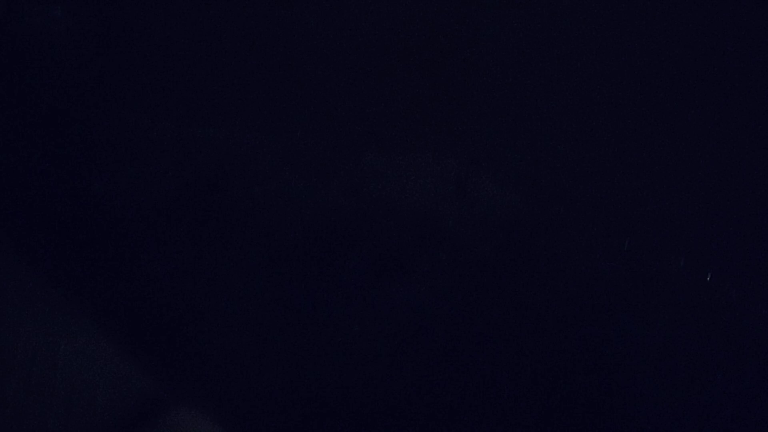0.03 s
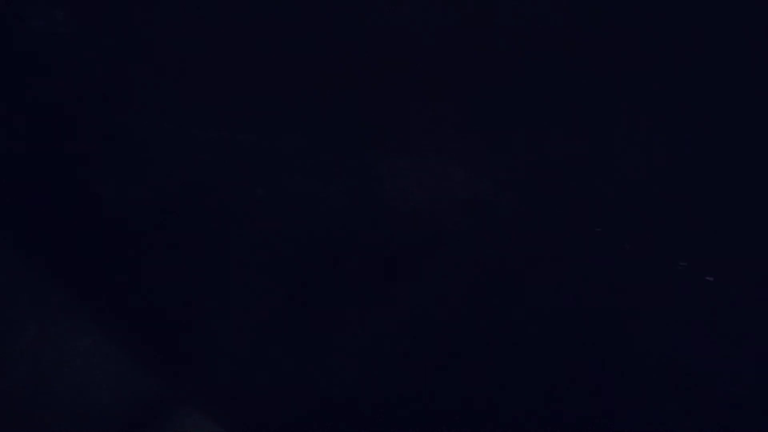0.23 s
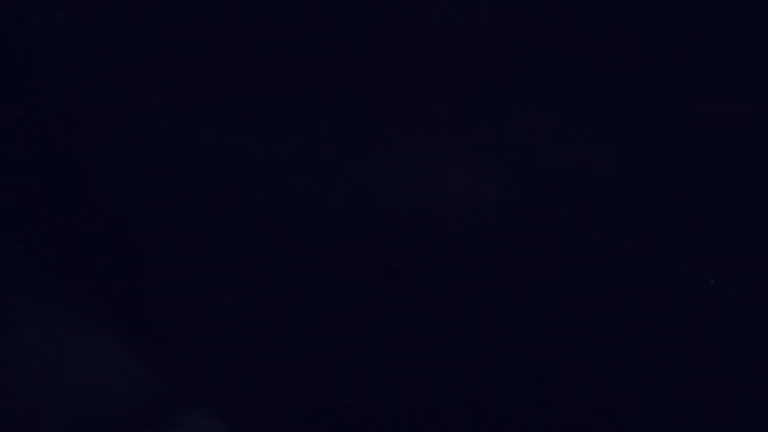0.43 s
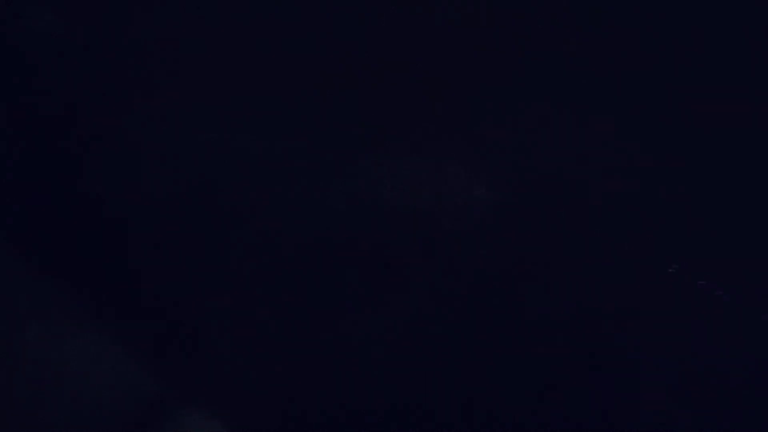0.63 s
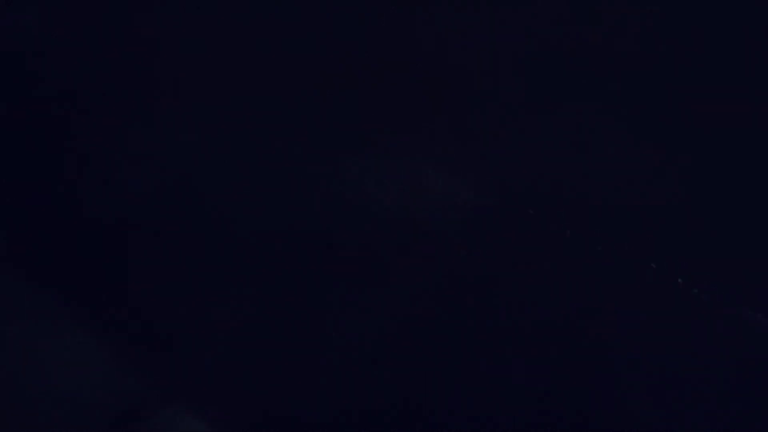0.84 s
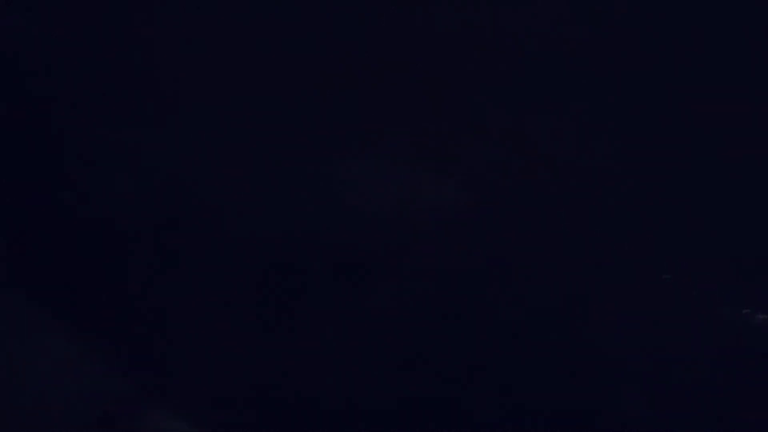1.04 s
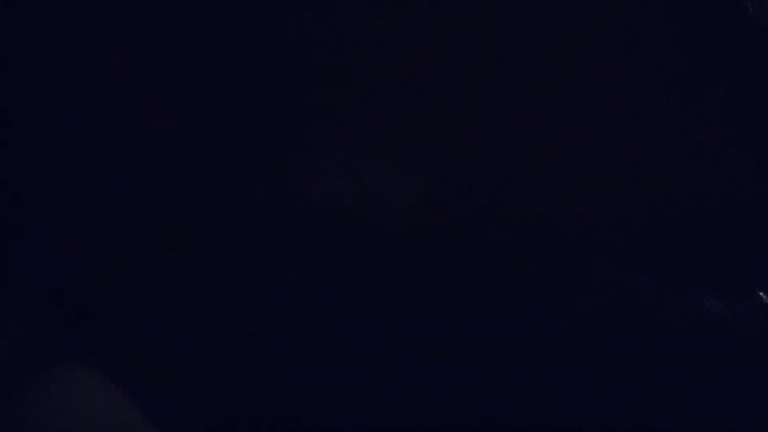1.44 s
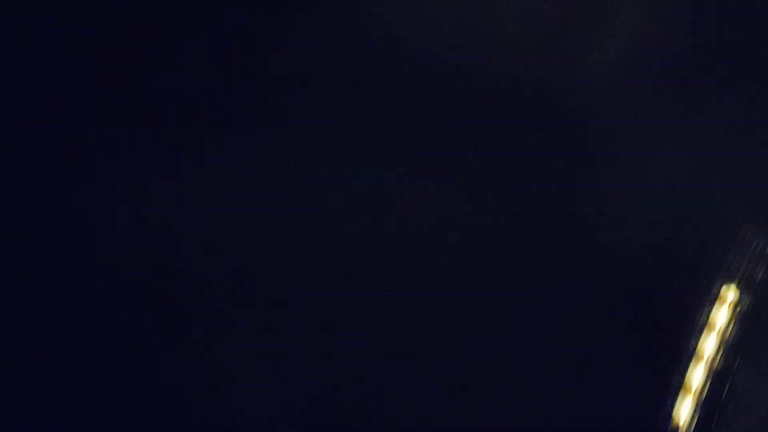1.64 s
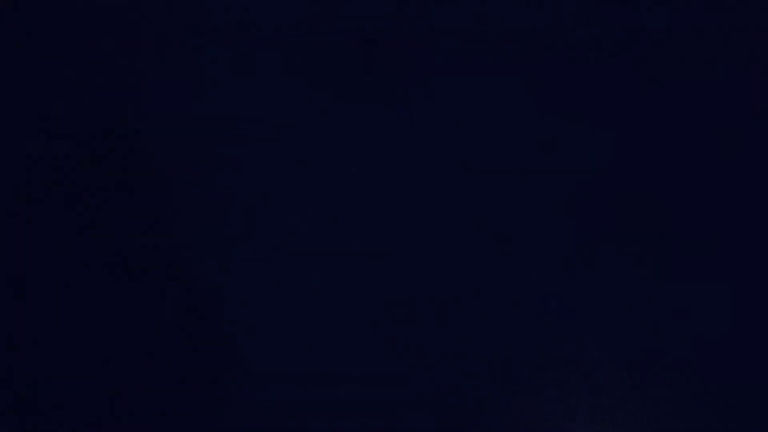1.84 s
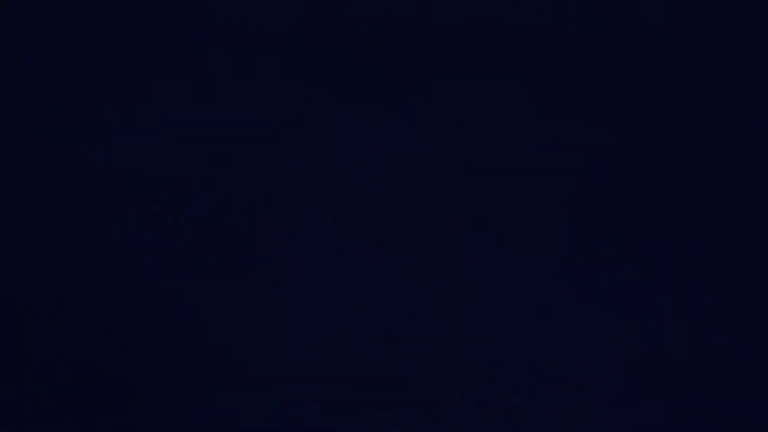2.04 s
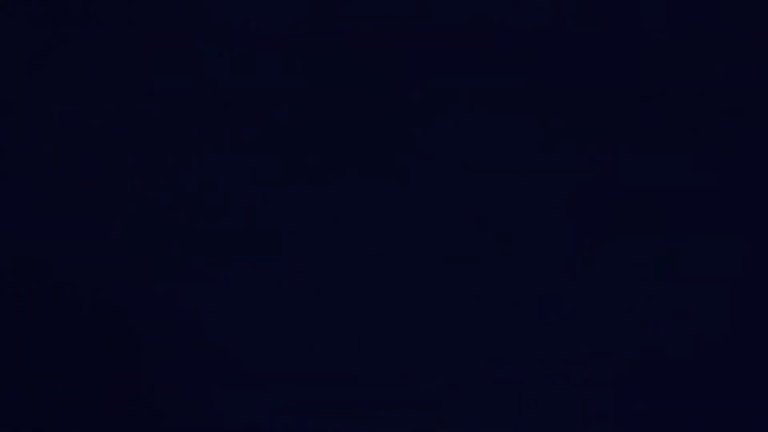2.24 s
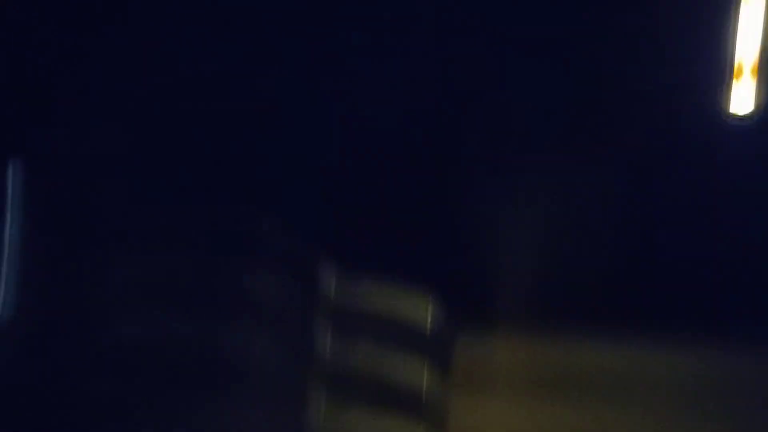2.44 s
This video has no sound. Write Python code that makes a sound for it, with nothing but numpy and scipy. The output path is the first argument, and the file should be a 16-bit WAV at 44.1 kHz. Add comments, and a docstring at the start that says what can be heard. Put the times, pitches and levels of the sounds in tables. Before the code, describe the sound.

A close frog's loud, rapid trill, then a softer frog answers over faint insect chirps.

```python
"""Night air fades in, an insect starts its falling chirps, and a frog swells into a trill close by.
Each pulse of the trill is a small arch of pitch from the vocal folds that rings the vocal sac.
A hand on the camera adds low rumble, soft bumps and clicks, thickest as the frog slows and stops.
Then a second frog, farther off, winds up into its own trill while the insect carries on behind it."""
import sys
import numpy as np
from scipy import signal
from scipy.fft import rfft, irfft
from scipy.io import wavfile
from scipy.ndimage import uniform_filter1d

SR = 44100
rng = np.random.default_rng(int(sys.argv[2]) if len(sys.argv) > 2 else 0)


def generate_wav(sig):
    """Save sig (samples, or channels by samples) to the path in sys.argv[1] as 16-bit PCM at SR."""
    pcm = np.round(np.clip(np.atleast_2d(sig).T, -1, 1) * 32767).astype(np.int16)
    wavfile.write(sys.argv[1], SR, pcm)


N = 110250

# Pace of each trill. Each row: time in seconds, pulses per second.
NEAR_PULSE_RATE = [(.176, 47.29), (.38, 45.72), (.62, 46.09), (.9, 45.96), (1.17, 45.75), (1.4, 41.26),
                   (1.56, 40.26), (1.67, 29.99)]
FAR_PULSE_RATE = [(1.82, 42.5), (1.95, 43.3), (2.06, 45.6), (2.25, 44.9), (2.5, 44.6)]
# Fader and pan of each frog. Each row: time in seconds, gain in dB, left minus right in dB,
# phase lead of the left side in radians.
NEAR_PLACEMENT = [(.17, -24.5, 7, -0.23), (.27, -16, 7, -.15), (.41, -10, 7, -0.18), (.72, -8.5, 7.5, 0.18),
                  (.95, -8.5, 7.5, 0.41), (1.3, -7, 6, .3), (1.42, -7.5, 5, 0.2), (1.53, -8, 1.5, -0.058),
                  (1.66, -9, -0.5, -0.22)]
FAR_PLACEMENT = [(1.82, -46, -1.5, -2.8), (1.93, -42, 3, -1.45), (2.04, -30, 2.5, -0.94),
                 (2.25, -27.5, 4.5, -0.74), (2.4, -27.5, 6, -0.91), (2.5, -25, 3.5, -2.4)]
# Peak of each frog's pitch arch. Each row: time in seconds, pitch in Hz.
NEAR_TOP_PITCH = [(.17, 1914), (.7, 1925), (1.25, 1935), (1.66, 1932)]
FAR_TOP_PITCH = [(1.82, 1320), (1.92, 1490), (2.02, 1639), (2.15, 1728), (2.3, 1762), (2.5, 1827)]
# Buzz that bypasses the sac. Each row: harmonic number, gain in dB.
NEAR_BUZZ = [(1, -24.5), (2, -42), (3, -65.5)]
FAR_BUZZ = [(1, -17), (2, -27), (4, -48.5)]
# Tone of a chirp. Each row: harmonic number, left gain in dB, right gain in dB.
CHIRP_HARMONICS = [(1, -48, -47.5), (2, -71.5, -53), (3, -76.5, -66)]
# The insect's fader. Each row: time in seconds, gain in dB.
INSECT_FADER = [(.17, -15.5), (.4, -3), (1.0, -2), (1.6, -0.5), (1.9, -2), (2.5, -5.5)]
# Bumps on the camera body. Each row: start in seconds, gain in dB, pitch in Hz.
BODY_BUMPS = [(.290, -34, 343), (1.344, -28.5, 192), (1.351, -32.5, 253), (1.570, -32.5, 281),
              (1.610, -24, 218), (1.734, -37.5, 383), (1.781, -29.5, 400), (2.426, -36, 306)]
# Case clicks. Each row: start in seconds, gain in dB, left minus right in dB,
# tilt above 2 kHz in dB per octave.
CASE_CLICKS = [(.3050, -26, 4, -4), (1.3437, -28, 6, 0), (1.3470, -27, 6, 0), (1.3497, -25, 6, 0),
               (1.3509, -13, 6, -1.5), (1.7815, -30, 0, 0)]
# Tone of the case. Each row: frequency in Hz, gain in dB.
CASE_EQ = [(300, -14), (1200, -12), (2300, -1), (4200, -7), (5500, -6), (6500, -9), (7800, -12),
           (11000, -15), (16000, -18)]
# Tone of the air and rumble. Each row: frequency in Hz, left gain in dB, right gain in dB.
AIR_EQ = [(20, -68.5, -76), (70, -69, -73), (130, -66, -68.5), (247, -78, -81.5), (474, -85.5, -86),
          (740, -87.5, -89), (1460, -86.5, -90), (2250, -106, -107), (3900, -102, -103),
          (4220, -94.5, -94.5), (5440, -104, -105), (6530, -108, -114), (7900, -114, -114),
          (9500, -110, -95), (10350, -110, -96.5), (12400, -113, -106), (15500, -115, -110)]
# Stereo width of that bed. Each row: frequency in Hz, left-right correlation (1 is narrowest).
AIR_CORRELATION = [(30, 0.17), (90, 1), (200, 0.67), (500, 0.38), (4000, 0.71), (9000, .1)]
# The bed's two faders. Each row: time in seconds, air gain in dB, rumble gain in dB.
AIR_FADERS = [(.15, -70, -72), (.175, -15, -28), (.28, -5, -23.5), (.4, 1, 0.5), (1.0, 1, -0.5),
              (1.6, 3, 2.5), (1.9, 0, 1), (2.5, -1, 3.5)]


def near_frog(spread_db=.2, pitch_jitter=.002, jitter_s=.00015):
    """The lead: a loud trill through a sac of fixed tuning that swells, holds and finally slows."""
    out = np.zeros((2, N))
    for s in pulse_times(NEAR_PULSE_RATE, start=.1706, end=1.67):
        size, detune, late = rng.standard_normal(3)
        top_hz = curve(NEAR_TOP_PITCH, s) * (1 + pitch_jitter * detune)
        pulse = frog_pulse(top_hz, sac_hz=1860, width_hz=113.3, harmonics=NEAR_BUZZ)
        add(out, s + jitter_s * late, amp(spread_db * size) * placed(pulse, NEAR_PLACEMENT, s))
    return outdoors(out, wet_db=-17.5)


def frog_pulse(top_hz, sac_hz, width_hz, harmonics):
    """The folds sweep up and down, ringing the sac; a little escapes as buzz and rasp."""
    top_s, rise_s, fall_s, arch_power = .0043, .0076, .011, 2.485
    pulse_s, swell_s, fade_power = .014, .0037, 2.6
    buzz_onset_s, buzz_fade_s, buzz_db_per_octave = .0003, .036, -5.5
    t = np.arange(SR // 25) / SR
    hz = top_hz / (1 + abs((t - top_s) / np.where(t < top_s, rise_s, fall_s)) ** arch_power)
    phase = 2 * np.pi * (np.cumsum(hz) / SR + rng.random())
    closing = np.clip(2 * (1 - t / pulse_s), 0, 1) ** .5
    flow = closing * t / swell_s * np.exp((1 - (t / swell_s) ** fade_power) / fade_power)
    sac = vocal_sac(flow * np.exp(1j * phase), sac_hz, width_hz)
    leak = closing * (1 - np.exp(-t / buzz_onset_s)) * np.exp(-(t / buzz_fade_s) ** 2)
    leak *= amp(buzz_db_per_octave * np.log2(hz / top_hz))  # stronger at the low ends of the arch
    buzz = sum(amp(db) * np.exp(1j * round(k) * phase) for k, db in harmonics)
    return sac + leak * (buzz + rasp(len(t)))


def vocal_sac(folds, hz, width_hz):
    """One resonance: the narrower it is, the longer it rings."""
    radius = np.exp(-np.pi * width_hz / SR)
    return signal.lfilter([1 - radius], [1, -radius * np.exp(2j * np.pi * hz / SR)], folds)


def rasp(samples, centre_hz=2600, width_hz=900, gain_db=-44):
    """Turbulence of the air passing the folds: a faint band of noise."""
    band = np.exp(-2 * ((np.fft.fftfreq(samples, 1 / SR) - centre_hz) / width_hz) ** 2)
    noise = np.fft.ifft(np.fft.fft(rng.standard_normal(samples)) * band)
    return amp(gain_db) * noise / noise.std()


def pulse_times(rate, start, end):
    """One pulse at the start, then one per cycle of the rate curve, which is slid to begin there."""
    t = np.arange(rate[0][0], rate[0][0] + end - start, 1 / SR)
    cycles = np.cumsum(curve(rate, t)) / SR
    return start + np.interp(np.arange(int(cycles[-1]) + 1), cycles, t - t[0])


def placed(pulse, table, s):
    """Gives a pulse its frog's level and stereo position at that moment."""
    phase_shift = np.exp(.5j * curve(table, s, column=3) * np.array([[1], [-1]]))
    return amp(curve(table, s)) * pan(curve(table, s, column=2)) * (phase_shift * pulse).real


def far_frog():
    """The answer: a softer trill whose pitch and level climb as the sac fills."""
    out = np.zeros((2, N))
    for s in pulse_times(FAR_PULSE_RATE, start=1.8195, end=2.5):
        top_hz = curve(FAR_TOP_PITCH, s)
        pulse = frog_pulse(top_hz, sac_hz=top_hz, width_hz=280, harmonics=FAR_BUZZ)
        add(out, s, placed(pulse, FAR_PLACEMENT, s))
    return outdoors(out, wet_db=-17)


def insect(start_s=.1668, chirps_per_s=32.63, chirp_s=.0145, spread_db=1, detune=.01):
    """Each wing stroke is a short falling whistle with two overtones."""
    out = np.zeros((2, N))
    progress = np.arange(0, chirp_s, 1 / SR) / chirp_s
    glide_hz = np.interp(progress, [0, 1], [4800, 4060])
    for s in np.arange(start_s, N / SR, 1 / chirps_per_s):
        size, shift = rng.standard_normal(2)
        phase = 2 * np.pi * np.cumsum(glide_hz) * (1 + detune * shift) / SR
        chirp = sum(amp([[left], [right]]) * np.sin(round(k) * phase)
                    for k, left, right in CHIRP_HARMONICS)
        add(out, s, chirp * np.sin(np.pi * progress) * amp(curve(INSECT_FADER, s) + spread_db * size))
    return outdoors(out, wet_db=-11)


def bumps(peak_s=.00077, side_db=5):
    """The hand bumps the camera body: dull, heavily damped tones, left of centre."""
    out, t = np.zeros((2, N)), np.arange(2048) / SR
    envelope = t / peak_s * np.exp(1 - t / peak_s)
    for s, db, hz in BODY_BUMPS:
        add(out, s, amp(db) * pan(side_db) * envelope * np.sin(2 * np.pi * hz * t))
    return out


def clicks(decay_s=.00051):
    """The camera case clicks: tiny noise bursts take on the tone of the shell."""
    out, t = np.zeros((2, N)), np.arange(2048) / SR
    hz = abs(np.fft.fftfreq(len(t), 1 / SR))
    for s, db, side_db, tilt_db in CASE_CLICKS:
        gain = amp(eq(CASE_EQ, hz) + tilt_db * np.log2(np.maximum(hz, 2000)))
        case = np.exp(np.conj(signal.hilbert(np.log(gain))))  # minimum phase keeps the attack sharp
        burst = rng.standard_normal((2, len(t))) * np.exp(-t / decay_s)
        click = np.fft.ifft(np.fft.fft(burst) * case).real
        click /= np.linalg.norm(click, axis=1, keepdims=True)
        add(out, s, 2 * amp(db) * pan(side_db) * click)
    return out


def night_air(patch_db=2.5, rumble_below_hz=110, frame=1024):
    """The bed: air, handling rumble and the high fizz of distant insects, in drifting patches."""
    hz = np.fft.rfftfreq(frame, 1 / SR)
    draws = rng.standard_normal((N * 4 // frame + 5, len(hz), 5)).T
    left, independent = draws[0] + 1j * draws[1], draws[2] + 1j * draws[3]
    shared = np.clip(eq(AIR_CORRELATION, hz), -1, 1)[:, None]
    right = shared * left + np.sqrt(1 - shared ** 2) * independent
    patches = uniform_filter1d(uniform_filter1d(draws[4], size=10, axis=0), size=10, axis=1)
    tone_db = np.array([eq(AIR_EQ, hz), eq(AIR_EQ, hz, column=2)])[:, :, None]
    spectra = np.array([left, right]) * amp(tone_db + patch_db * patches / patches.std())
    noise = signal.istft(spectra, nperseg=frame, noverlap=frame * 3 // 4)[1][:, :N]
    noise *= np.sqrt(1.5 * SR / frame)
    rumble = signal.sosfiltfilt(signal.butter(2, rumble_below_hz, fs=SR, output="sos"), noise)
    t = np.arange(N) / SR
    return (noise - rumble) * amp(curve(AIR_FADERS, t)) + rumble * amp(curve(AIR_FADERS, t, column=2))


def outdoors(dry, wet_db, predelay_s=.007, scatter_t60_s=.078, tail_t60_s=.8, tail_db=-13):
    """Ground and plants scatter dense early echoes, then a faint tail, different on each side."""
    t = np.arange(SR // 2) / SR
    fade = amp(-60 * t / scatter_t60_s) + amp(tail_db - 60 * t / tail_t60_s) / 2
    spectrum = rfft(rng.standard_normal((2, len(t))) * fade * (t > predelay_s))
    smooth_power = uniform_filter1d(abs(spectrum) ** 2, size=120, axis=1)
    echo = irfft(spectrum / np.sqrt(smooth_power))  # keeps the reverb neutral in tone
    return dry + amp(wet_db) * signal.fftconvolve(dry, echo, axes=1)[:, :N]


def amp(db):
    """Decibels to gain."""
    return 10 ** (np.asarray(db) / 20)


def curve(table, s, column=1):
    """Reads an automation lane, with straight ramps between its points."""
    table = np.array(table)
    return np.interp(s, table[:, 0], table[:, column])


def eq(table, hz, column=1):
    """Reads a curve on a log-frequency axis."""
    table = np.array(table)
    return np.interp(np.log(hz + 1), np.log(table[:, 0]), table[:, column])


def pan(db):
    """Left and right gains; positive dB leans left."""
    return amp(np.array([[db / 2], [-db / 2]]))


def add(mix, s, sound):
    """Drops a sound into the mix at s seconds."""
    part = mix[:, max(round(s * SR), 0):][:, :sound.shape[-1]]
    part += sound[..., :part.shape[1]]


def scene():
    """Two frogs up front; behind them the insect, the hand on the camera and the night air."""
    return near_frog() + far_frog() + insect() + bumps() + clicks() + night_air()


def record(dry, port_hz=6500, port_q=10, ring_db=8, cutoff_hz=15850):
    """The microphone ports ring in the treble; a steep low-pass trims the very top."""
    ring = amp(ring_db) * signal.lfilter(*signal.iirpeak(port_hz, port_q, fs=SR), dry)
    lowpass = signal.firwin(511, cutoff_hz, window=("kaiser", 9), fs=SR)
    return signal.oaconvolve(dry + ring, lowpass[None], "same")


dry = scene()
out = record(dry)
generate_wav(out)
```